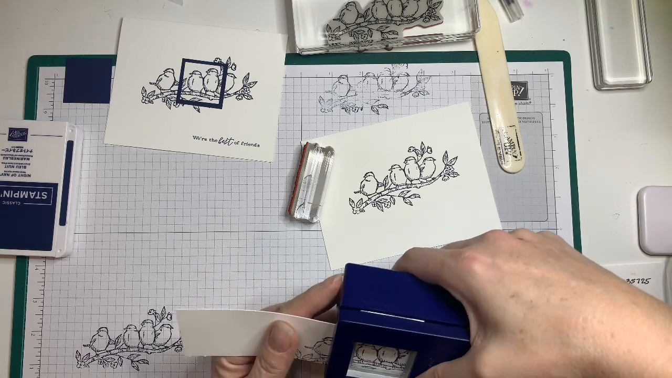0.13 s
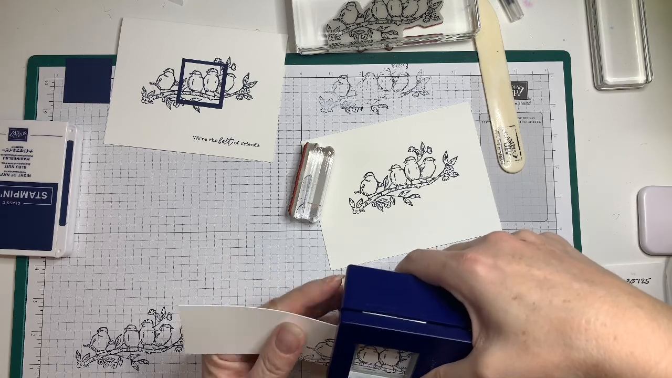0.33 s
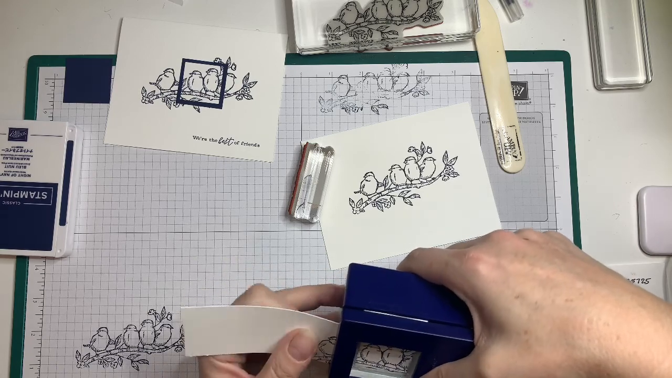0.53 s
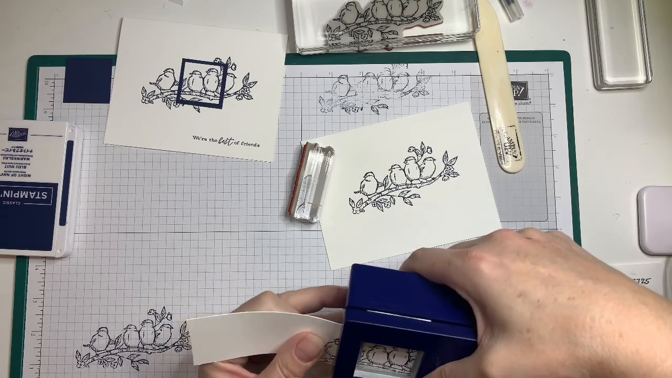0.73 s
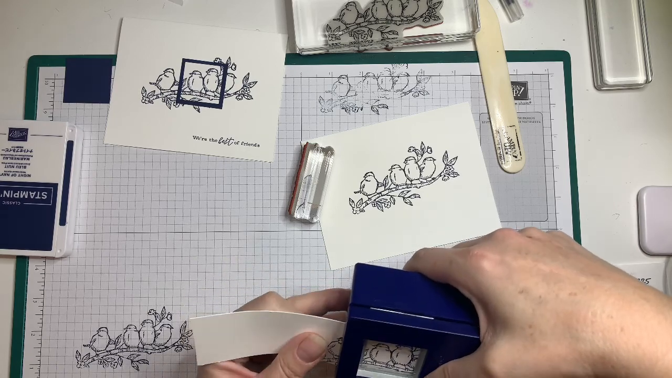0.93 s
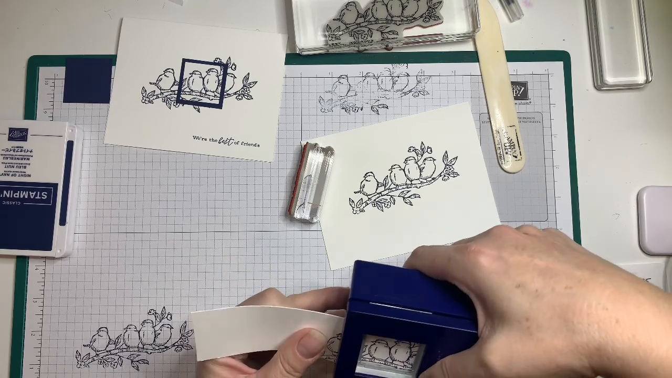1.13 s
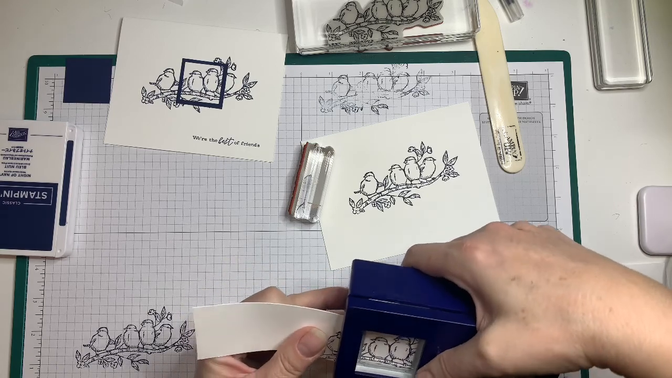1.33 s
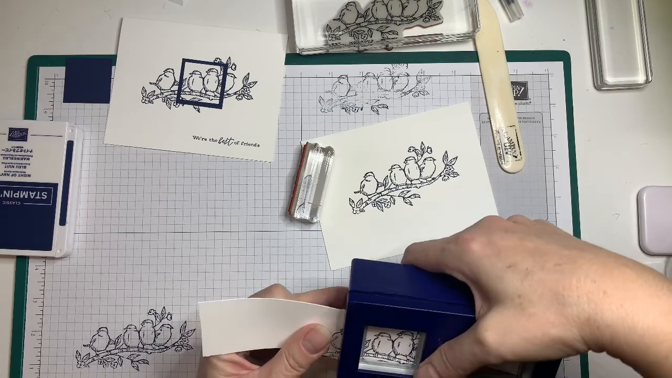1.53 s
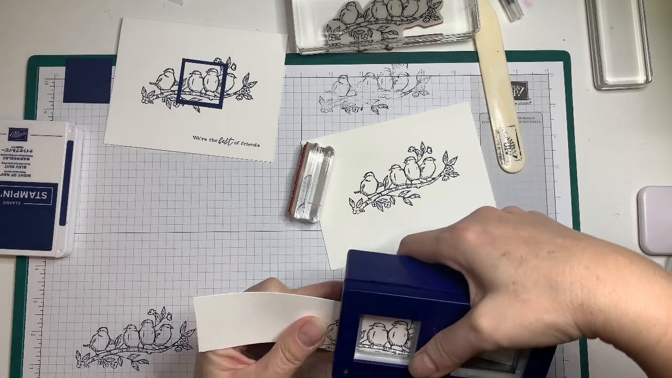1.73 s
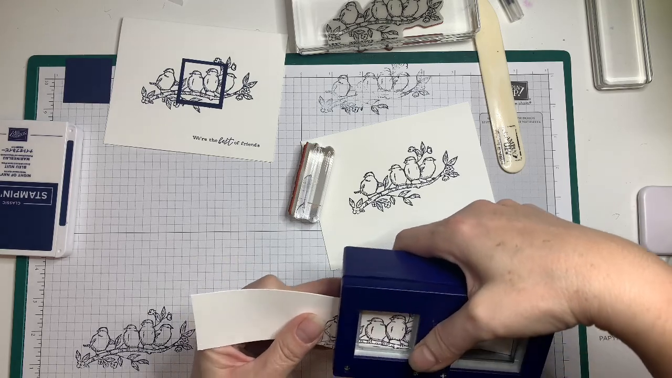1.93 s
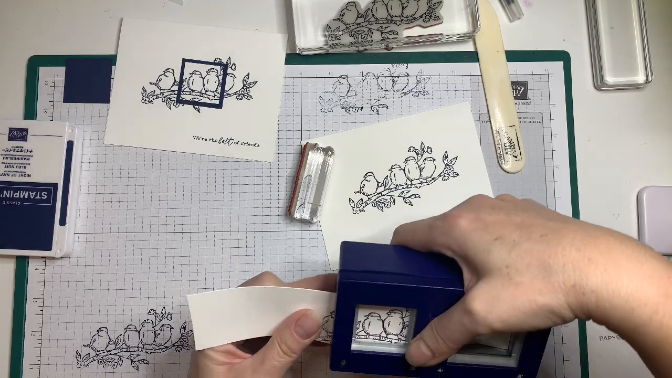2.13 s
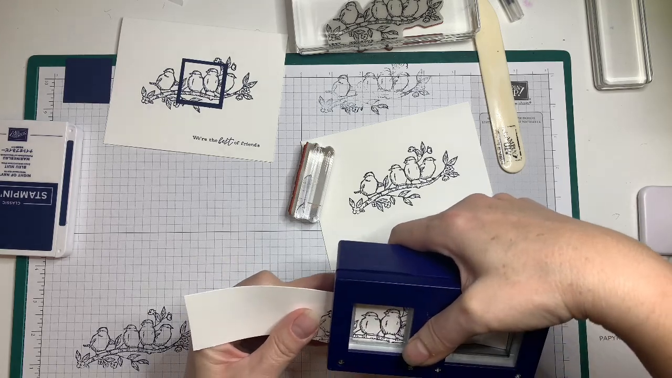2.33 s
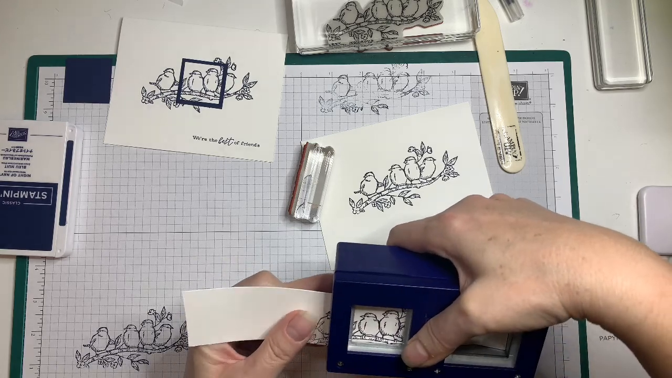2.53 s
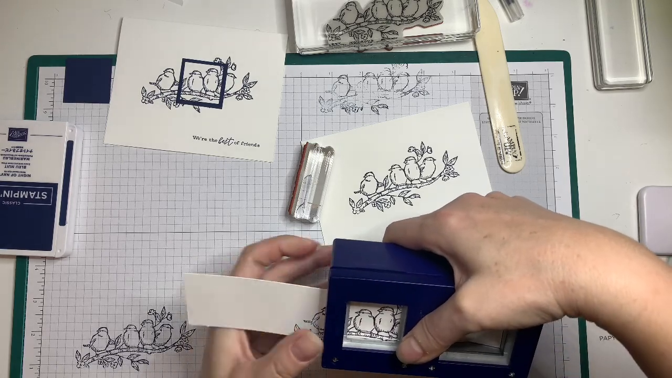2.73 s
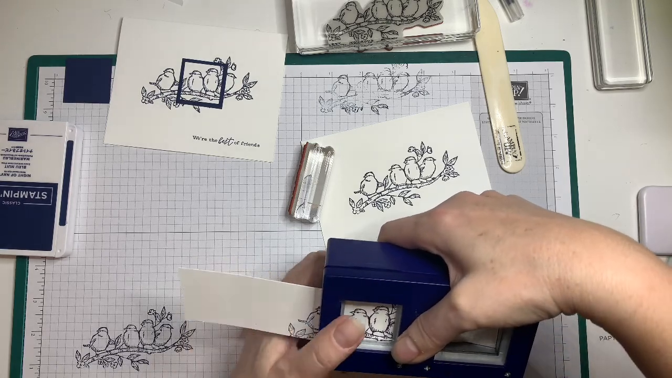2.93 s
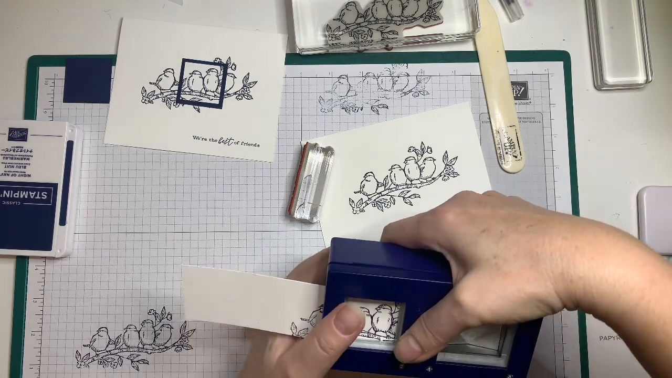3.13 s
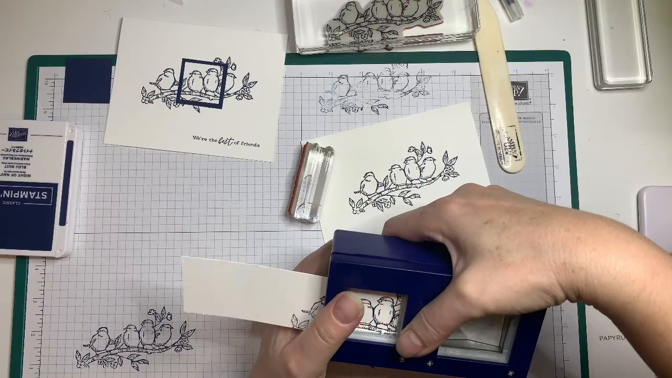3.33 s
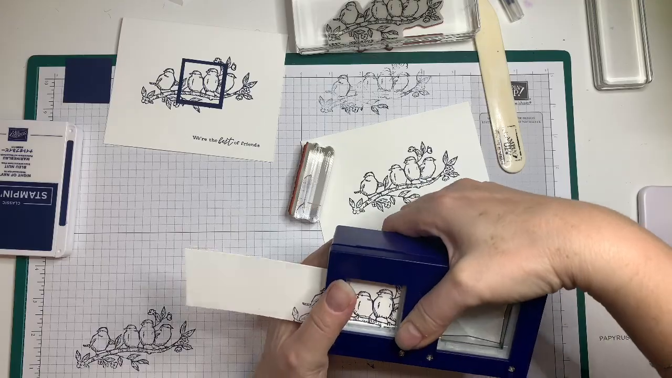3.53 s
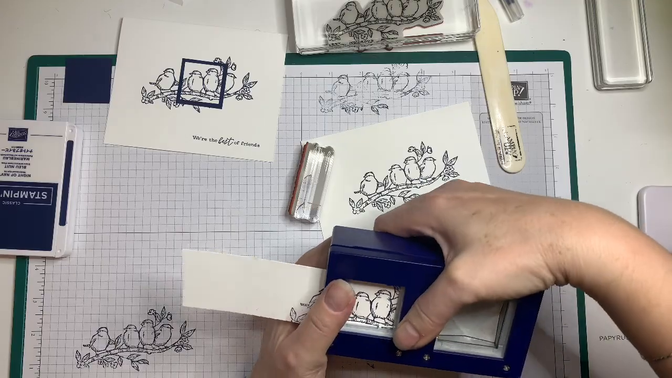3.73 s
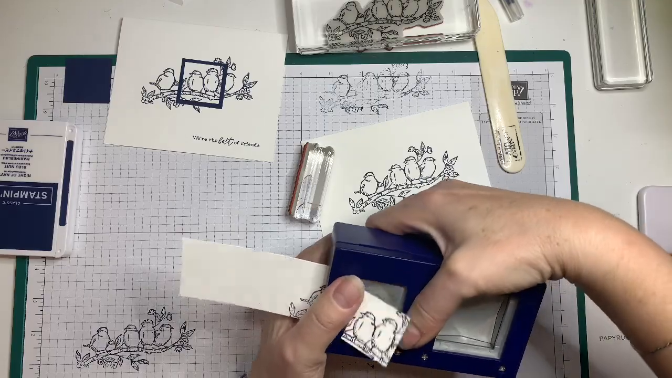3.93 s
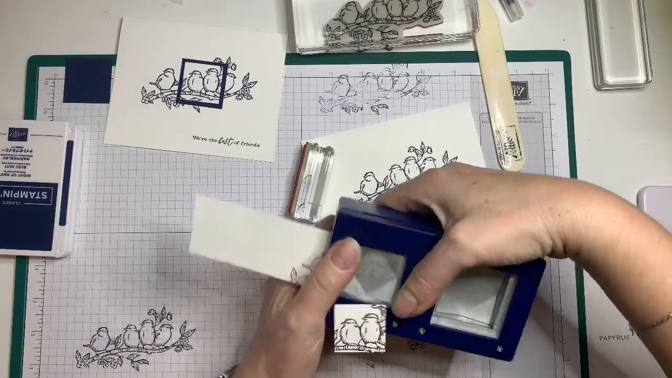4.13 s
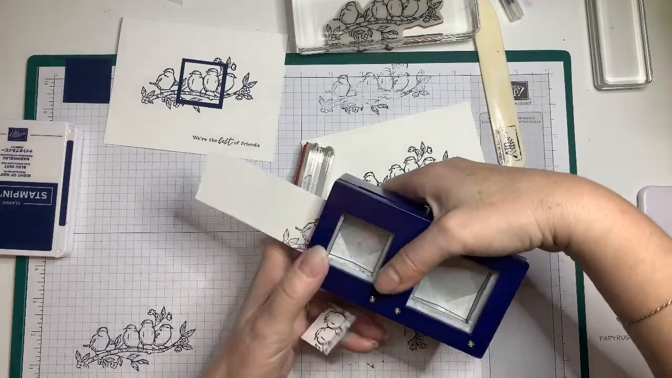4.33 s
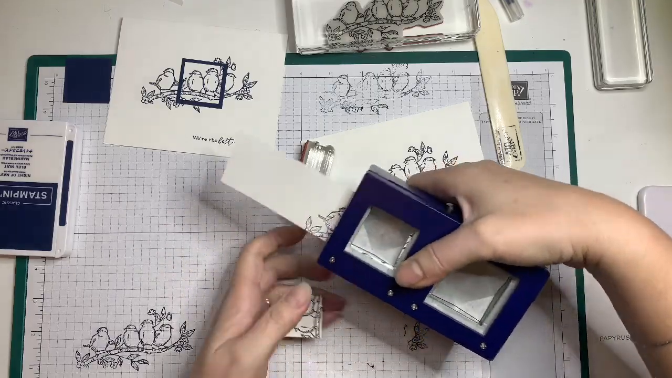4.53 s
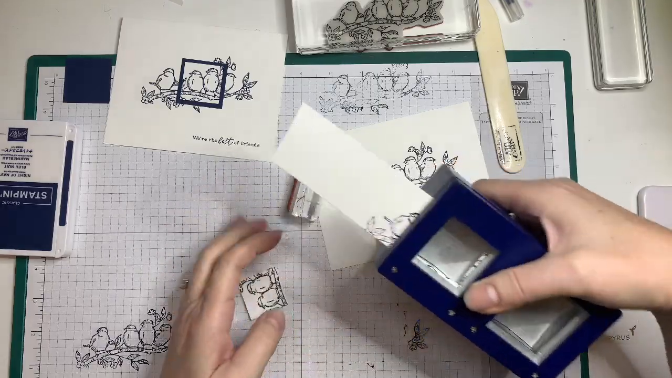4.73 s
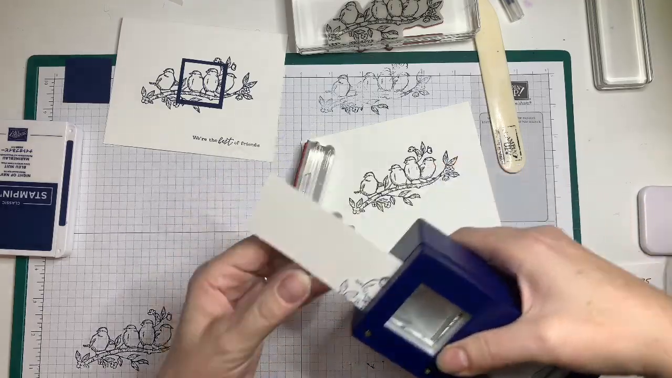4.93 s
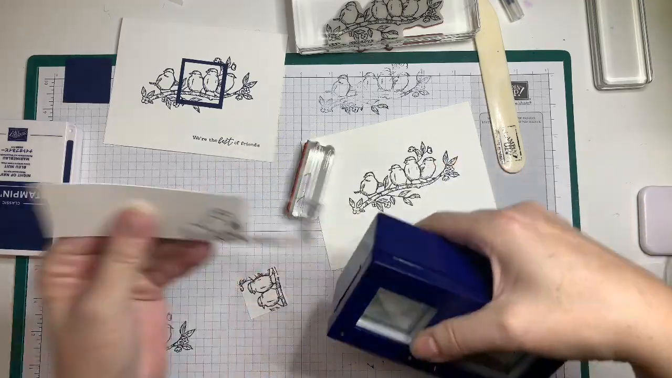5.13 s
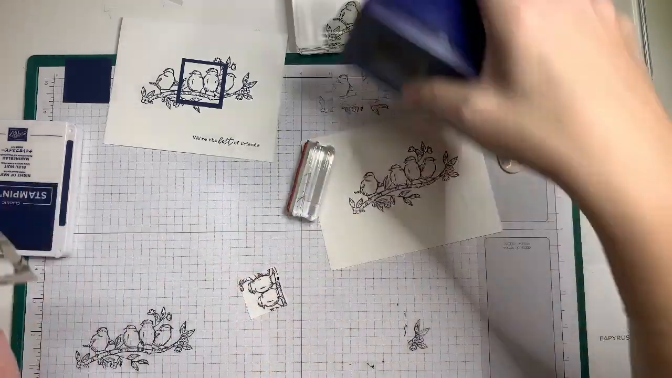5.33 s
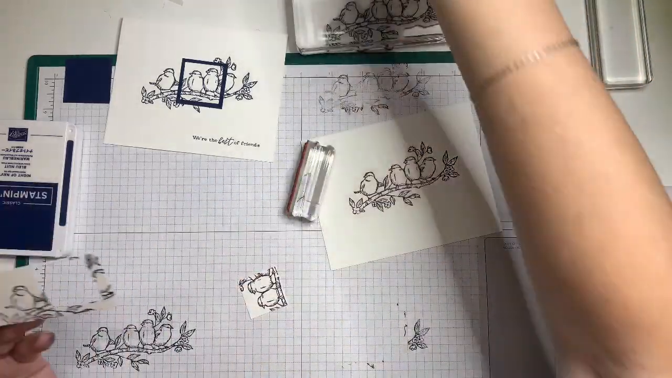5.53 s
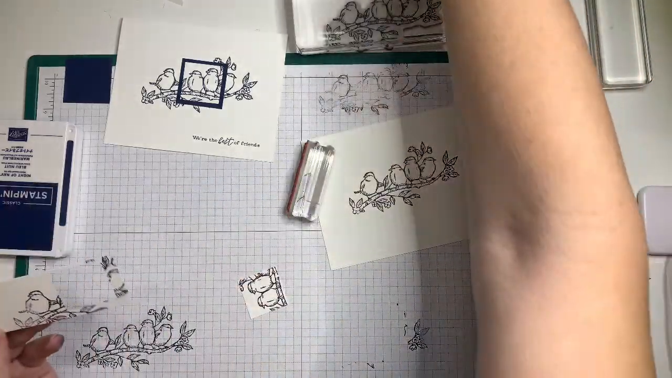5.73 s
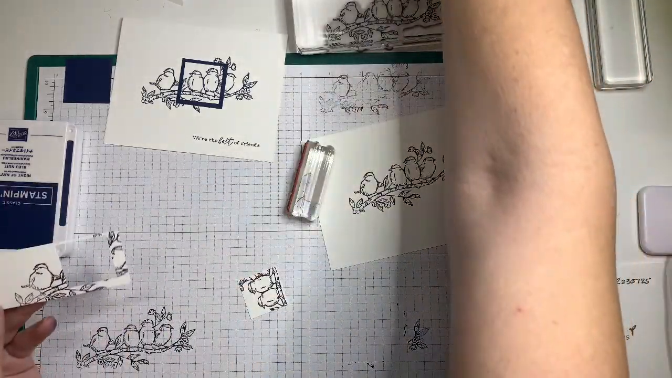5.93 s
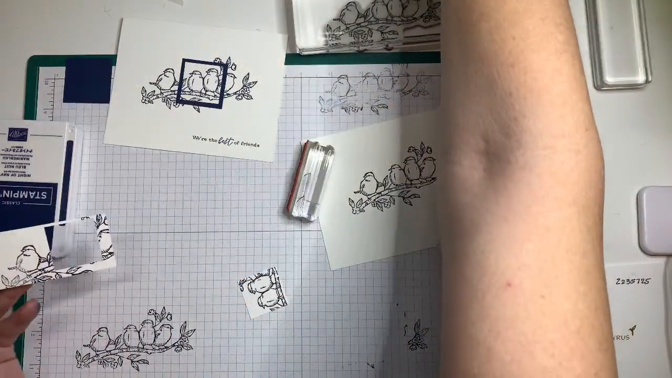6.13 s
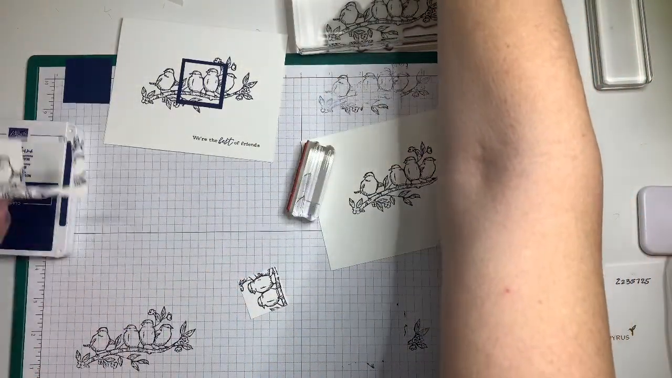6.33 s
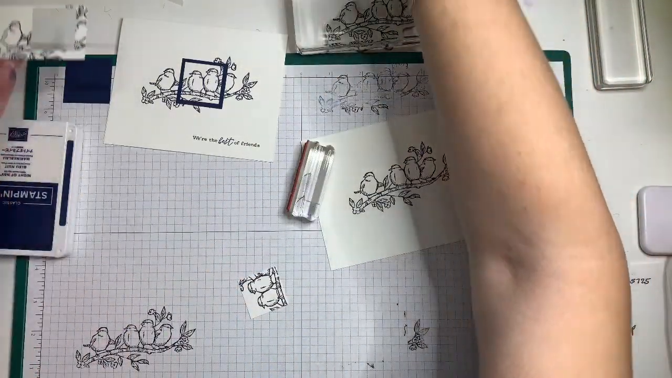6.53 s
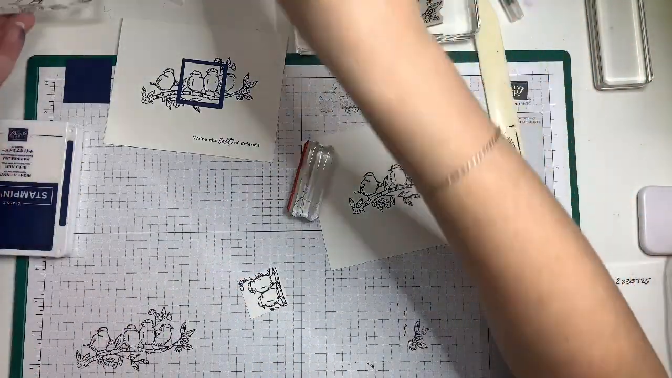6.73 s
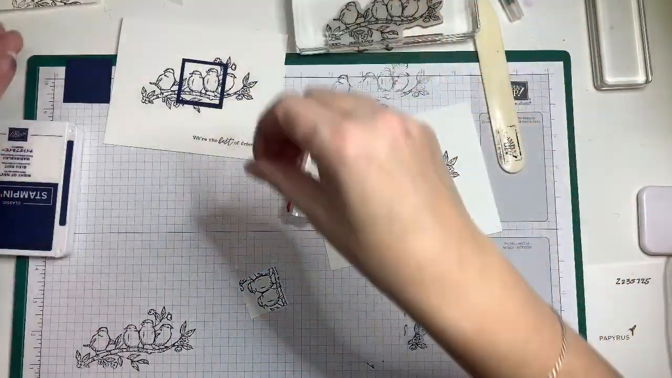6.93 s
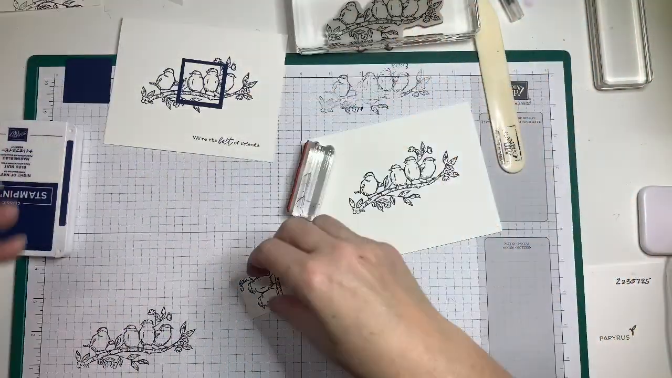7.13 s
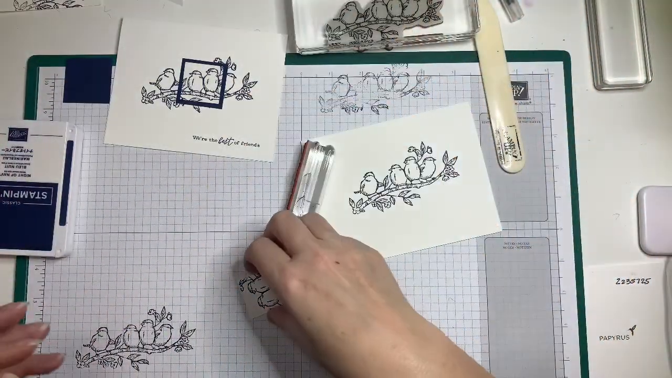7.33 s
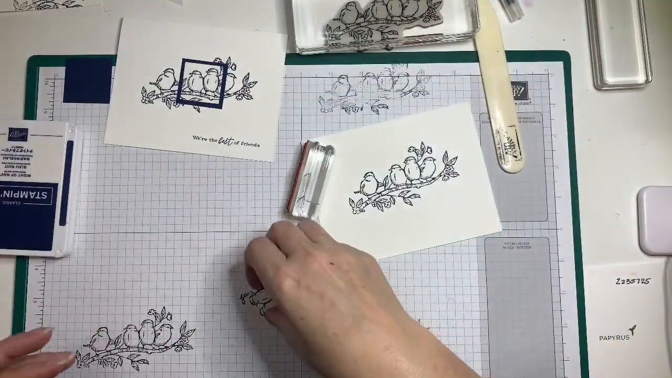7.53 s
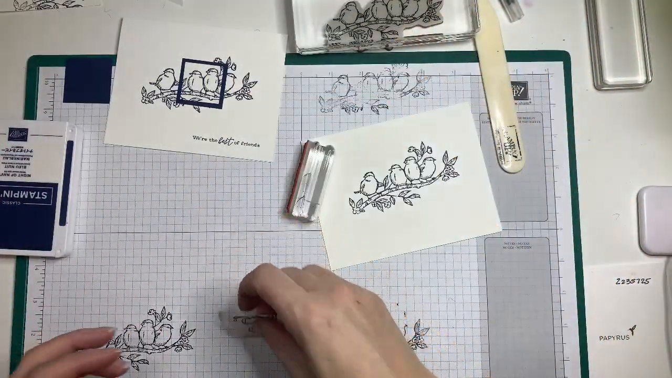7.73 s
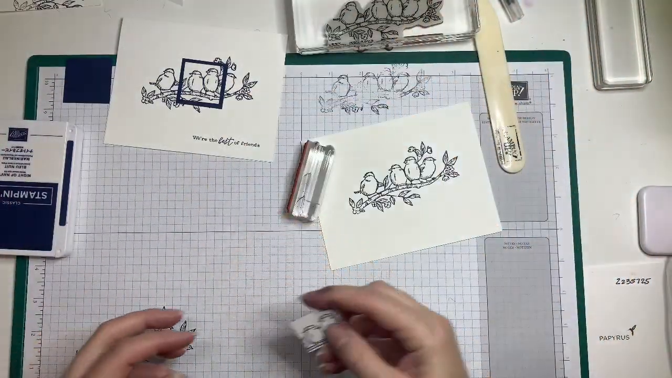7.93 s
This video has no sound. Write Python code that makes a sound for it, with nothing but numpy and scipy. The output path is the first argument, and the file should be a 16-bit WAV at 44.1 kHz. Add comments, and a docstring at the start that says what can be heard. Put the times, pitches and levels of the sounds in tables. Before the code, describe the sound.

A quiet small room, low rumble and a faint appliance hum, heard close to a desk. From 0 to 3 seconds card rubs faintly in a plastic punch, with sparse light ticks near 0.1, 0.4, 1.1 and 1.8, and barely audible squeaks around 2.5 to 3. A clearer click comes at 3.1. At 3.8 the lever grinds briefly and the die snaps through: a very loud, bright, dry crack, with a second hard slam at 3.87. From 4.1 to 4.2 the lever ratchets back in a short grind with several quick clicks; another tick at 4.4. Around 5.0 the paper strip rasps out with two small clicks, then soft brushing. At 6.1 the punch thuds firmly on the desk in a fast cluster, knocks again at 6.26, and clinks glassily at 6.32. From 7.3 soft fingertip bumps and light paper scuffs finish it.

```python
"""Faint rubs and light clicks come first: card is nudged into the slot of a plastic craft punch on a desk, close by.
The die snaps through, the lever hits its stop and grinds back up; the strip slides out, the punch thuds down and
clinks against something hard, and fingers pick up the cut piece. Blows are bursts of noise through resonances,
desk and glass are damped sines, rubs and grinding are random slips; a small room answers over rumble and hum.
A limiter drops the level at loud peaks, holds it down, then lets it recover."""
import sys
import numpy as np
from scipy import signal
from scipy.fft import rfft, irfft, next_fast_len
from scipy.io import wavfile
from scipy.ndimage import uniform_filter1d, minimum_filter1d, map_coordinates

SR = 44100
rng = np.random.default_rng(int(sys.argv[2]) if len(sys.argv) > 2 else 0)


def to_wav(sig):
    """Store sig (one row per channel, or 1-D mono) as 16-bit WAV at the path in sys.argv[1].

    Samples outside -1..1 are clipped; the rate is SR.
    """
    pcm = np.clip(np.atleast_2d(sig), -1, 1) * 32767
    pcm = np.round(pcm).astype(np.int16)
    wavfile.write(sys.argv[1], SR, pcm.T)  # frames by channels


N = 352800
TIME = np.arange(N) / SR
BRIEF = TIME[:SR // 3]  # time axis of single blows and of the echoes

# resonances of the plastic housing: pitch_hz [Hz], width_hz [Hz], level_db [dB]
HOUSING_MODES = [(866, 47, 0.5), (1036, 490, -7), (1690, 320, -6), (2000, 280, -4.5), (2336, 220, 0),
                 (3180, 630, -7.5), (3960, 230, 3), (4130, 130, -8.5), (4900, 170, -14.5)]
# the small shell radiates little bass: pitch_hz [Hz], level_db [dB]
HOLLOW_COLOUR = [(150, -20.5), (480, -15.5), (900, 9.5)]
# bright noise band for cracks and fizz, with a dip near 12.5 kHz: pitch_hz [Hz], level_db [dB]
TREBLE_COLOUR = [(3000, -29.5), (5000, 1.5), (7200, 1.5), (10000, -5.5), (12500, -23), (15500, -6.5)]
# spectrum of the low knock in a blow: pitch_hz [Hz], level_db [dB]
KNOCK_COLOUR = [(60, -15.5), (170, -4.5), (350, 3.5), (600, 1.5), (1100, -4.5), (3000, -38.5)]


def punch():
    """The card gives way in two tears that ring the die, then the lever slams on its stop."""
    # the punch stroke: start_s [s], level_db [dB], length_s [s]; knock_db, treble_db, die_db [dB over the level]
    snaps = [(3.8235, 2, 0.0056, -30.5, -14, -7), (3.8265, 7.5, 0.0032, -28.5, -17, 2),
             (3.8742, 4.5, 0.0093, -23.5, -4, -23.5)]
    # resonances of the steel die: pitch_hz [Hz], width_hz [Hz], level_db [dB]
    die_modes = [(2280, 480, -2.5), (4100, 180, -2.5)]
    out = np.zeros(N)
    for start_s, level_db, length_s, knock_db, treble_db, die_db in snaps:
        shell = plastic(length_s, knock_db, treble_db)
        die = amp(die_db) * contact(body(die_modes), length_s)
        add(out, start_s, amp(level_db) * (shell + die))
    held_aloft = colour([(160, -10), (350, 2)])  # off the desk, the punch moves little air in the bass
    return placed(filtered(out, held_aloft), near_db=-3, wet_db=-9.0)


def plastic(length_s, knock_db, treble_db):
    """One blow on the housing: its resonances, a low knock and a bright crack."""
    shell = contact(housing, length_s)
    knock = amp(knock_db) * contact(colour(KNOCK_COLOUR), length_s)
    crack = amp(treble_db) * contact(colour(TREBLE_COLOUR), length_s)
    return shell + knock + crack


def housing(hz):
    """Response of the punch's plastic shell: resonances with little bass."""
    return body(HOUSING_MODES)(hz) * colour(HOLLOW_COLOUR)(hz)


def lever():
    """Stick-slip of the moving die sounds through the housing, with a fizz of card fibres."""
    # the lever goes down, then back up: start_s [s], stop_s [s], full level_db [dB], build_db [dB]
    travels = [(3.806, 3.873, -15, 34.5), (4.138, 4.21, -34.5, 15.5)]
    build_s, stop_db_per_s = 0.028, 904.5  # friction builds under the hand and dies at the stop
    friction = np.zeros(N)
    for start_s, stop_s, level_db, build_db in travels:
        slack = np.clip(1 - (TIME - start_s) / build_s, 0, 1)
        stopping_db = stop_db_per_s * np.maximum(TIME - stop_s, 0)
        friction += (TIME > start_s) * amp(level_db - build_db * slack - stopping_db)
    slips = grains(rate=1100, spread_db=2)
    darker = colour([(2500, 0), (4000, -8)])
    ring = unit(filtered(slips, lambda hz: housing(hz) * darker(hz)))
    fizz = unit(filtered(grains(rate=6100, spread_db=5.5), colour(TREBLE_COLOUR)))
    return placed(friction * (ring + amp(-13.5) * fizz), near_db=-1.0, wet_db=-16.5)


def clicks():
    """Light contacts, each with a faint swell of noise leading in, favour other modes; dull ones lose upper modes."""
    # contacts of card, lever and housing: start_s [s], level_db [dB];
    # treble_db, knock_db [dB over the level]; favoured_hz [Hz]
    light_contacts = [(0.12, -44, -11, -11.5, 2450), (0.325, -53, -5.5, -31, 2420),
                      (0.379, -43, -11, -41, 2350), (0.508, -57, -15, -38, 2300),
                      (1.111, -52.5, -27, -23, 1570), (1.132, -40, -25, -40, 1560),
                      (1.213, -48, -41, -26.5, 1710), (1.826, -45.5, -13, -14, 1700),
                      (3.067, -57.5, -15.5, -22, 2320), (3.141, -30.5, -9.5, -14, 3120),
                      (3.323, -49, -9, -35, 3370), (3.627, -62.5, -9.5, -24, 3870),
                      (3.775, -43, -6, -25, 885), (4.124, -48.5, 1, -23, 1700),
                      (4.132, -41.5, -16, -17, 1720), (4.163, -33, -8, -25, 2160),
                      (4.182, -32.5, -19, -27, 2160), (4.201, -33.5, -22.5, -17, 1710),
                      (4.215, -26.5, -14.5, -26, 2480), (4.413, -38, -16, -30.5, 2240),
                      (4.838, -57.5, -24, -18, 1610), (4.903, -55.5, -5.5, -5, 926),
                      (4.982, -39, -6.5, -8.5, 4300), (4.991, -40, -5.5, -11, 900),
                      (6.108, -41.5, 2, -8, 1920), (6.746, -57.5, -10, 0, 4200),
                      (6.856, -58, -14, -11, 4160), (7.334, -64.5, -6, -3.5, 1370),
                      (7.41, -67, 1.5, -2, 1140), (7.484, -59, 5, 1, 850), (7.663, -58, 2, -20.5, 4510)]
    click_s = 0.0062
    bright_hz, db_per_octave = 5400, 19  # upper edge at treble 0 dB; treble lost for each octave it sinks
    favour_db, favour_octaves = 10.5, 0.35  # lift of the modes near the favoured frequency, and its spread
    out = np.zeros(N)
    for start_s, level_db, treble_db, knock_db, favoured_hz in light_contacts:
        edge_hz = bright_hz * 2 ** (treble_db / db_per_octave)
        modes = []
        for hz, width_hz, mode_db in HOUSING_MODES:
            octaves_off = np.log2(hz / favoured_hz)
            lift_db = favour_db * np.exp(-(octaves_off / favour_octaves) ** 2)
            modes.append((hz, width_hz, mode_db + lift_db))
        shell = lambda hz: body(modes)(hz) * colour(HOLLOW_COLOUR)(hz) / (1 + 1j * hz / edge_hz) ** 2
        crack = amp(treble_db) * contact(colour(TREBLE_COLOUR), click_s)
        knock = amp(knock_db) * contact(colour(KNOCK_COLOUR), click_s)
        add(out, start_s, amp(level_db) * (contact(shell, click_s) + crack + knock))
        lead_in = contact(shell, length_s=0.0093, rise_s=0.0045)
        add(out, start_s - 0.011, amp(level_db - 23) * lead_in)
    return placed(out, near_db=-1.5, wet_db=-4.5)


def desk():
    """Hard blows clack and ring the panel; padded ones only stir its low modes."""
    # dull blows on the desk: start_s [s], level_db [dB], clack_s [s]; clack_db, boom_db [dB over the level]
    thuds = [(5.408, -48.5, 0.027, -18, -20.5), (6.077, -17, 0.012, -13.5, 0),
             (6.107, -13.5, 0.0078, -10.5, -2.5), (6.117, -22.5, 0.041, -17, 2.5),
             (6.26, -27, 0.0071, -15, -5), (6.267, -28, .01, -24, 2)]
    # padded bumps of hand and fingertips: start_s [s], level_db [dB]
    bumps = [(3.376, -60.5), (4.385, -55), (7.337, -36.5), (7.359, -42.5), (7.414, -45), (7.49, -50)]
    # panel modes: pitch_hz [Hz], level_db [dB], t60_s [s]
    panel_modes = [(211.8, -0.5, 0.11), (264.6, -8, 0.17), (370.8, 6.5, 0.056), (406, 0, 0.058),
                   (508, -5.5, 0.061), (640, -3.5, 0.03)]
    # lower desk modes: pitch_hz [Hz], level_db [dB], t60_s [s]
    boom_modes = [(62.34, -15, 0.41), (102.4, -7, 0.27), (139, -1, 0.086), (178.4, -0.5, 0.054)]
    # spectrum of the hard clack: pitch_hz [Hz], level_db [dB]
    clack_colour = [(250, -8.5), (600, 2), (1200, 3), (1450, -6.5), (1850, -5), (2400, -8.5), (3200, -13),
                    (4500, -16.5), (9000, -23.5), (15000, -38)]
    out = np.zeros(N)
    for start_s, level_db, clack_s, clack_db, boom_db in thuds:
        panel = ringing(panel_modes, bloom=1.6)
        boom = amp(boom_db) * ringing(boom_modes, bloom=1.33)
        clack = amp(clack_db) * contact(colour(clack_colour), clack_s)
        add(out, start_s, amp(level_db) * (panel + boom + clack))
    padding = colour([(270, 3.0), (400, -12.0), (700, -17.5)])
    for start_s, level_db in bumps:
        soft = filtered(ringing(panel_modes + boom_modes, bloom=1.3), padding)
        add(out, start_s, amp(level_db) * soft)
    return placed(out, near_db=-4.5, wet_db=-3.0)


def clink():
    """A sharp crack, a brief buzz of the touching edges and a few fading glassy modes."""
    # the punch touches a hard, glassy object: start_s [s], ring_db [dB], crack_db [dB]
    clinks = [(6.3194, -36, -21.5)]
    # glassy modes: pitch_hz [Hz], level_db [dB], t60_s [s]
    glass_modes = [(2115, 5, 0.21), (2590, -6, 0.23), (2670, -29, 0.172), (4354, -2.5, 0.12),
                   (4590, -9, 0.1), (5430, -4, 0.12), (5281, -6, .2), (5870, 10.5, 0.065),
                   (6330, -6.5, 0.14)]
    # spectrum of crack and buzz: pitch_hz [Hz], level_db [dB]
    crack_colour = [(300, -8), (1000, -6.5), (1500, 6.5), (2200, 7.5), (3800, -2), (6200, 6), (7500, -14),
                    (9000, -35), (15000, -48.5)]
    out = np.zeros(N)
    for start_s, ring_db, crack_db in clinks:
        crack = contact(colour(crack_colour), length_s=0.00424)
        buzz = amp(-10.5) * contact(colour(crack_colour), length_s=0.021)
        ring = amp(ring_db) * ringing(glass_modes, bloom=1)
        add(out, start_s, ring + amp(crack_db) * (crack + buzz))
    return placed(out, near_db=-3.5, wet_db=-13)


def sliding():
    """Paper fibres catch and slip in each stroke: grainy rub, finer hiss, faint rough squeak; hands brush the mat."""
    # strokes of card and hands over the desk: start_s [s], length_s [s], rub_db [dB], hiss_db [dB over the rub]
    strokes = [(-.04, 0.164, -59, -9), (0.2, 0.37, -67, -1), (0.518, 0.24, -69, -3), (1.1, 0.33, -66, -15),
               (1.725, 0.177, -70, -3.5), (1.997, 0.067, -70.5, -3.5), (2.39, 0.26, -71, -4),
               (2.85, 0.4, -81.5, 2), (3.303, 0.082, -61.5, -9.5), (3.673, .11, -69, -6),
               (4.41, 0.44, -70, 2.5), (4.699, 0.34, -76.5, -2.5), (4.975, .165, -49.5, 3.5),
               (5.075, 0.63, -67, -2), (5.5, 0.56, -72, -3.5), (6.72, 0.14, -66.5, -10.5),
               (7.309, 0.144, -81, 1), (7.594, 0.13, -68.5, 6.5), (7.752, 0.154, -63.5, -2),
               (7.954, 0.14, -68.5, -3)]
    # card squeaks in the slot: start_s [s], length_s [s], level_db [dB]
    squeaks = [(2.491, 0.13, -65), (2.617, 0.16, -72), (2.852, 0.17, -71.5)]
    # spectrum of the rub: pitch_hz [Hz], level_db [dB]
    rub_colour = [(300, -25.5), (550, -14.5), (880, -3), (1400, -6), (2050, 4), (2600, -3.5), (3200, -2.5),
                  (4500, -5.5), (7000, -23.5), (11000, -45.5)]
    # spectrum of the fine fibre hiss: pitch_hz [Hz], level_db [dB]
    hiss_colour = [(2500, -24), (4300, 4.5), (6000, 2), (9000, -3.5), (11000, -10.5), (12500, -21.5),
                   (15000, -11)]
    rubbing, hissing = amp(-83.5), amp(-88)  # the held card is never quite still
    for start_s, length_s, rub_db, hiss_db in strokes:
        level = amp(rub_db) * stroke(start_s, length_s)
        rubbing = np.maximum(rubbing, level)
        hissing = np.maximum(hissing, amp(hiss_db) * level)
    squeaking = sum(amp(level_db) * stroke(start_s, length_s) for start_s, length_s, level_db in squeaks)

    pressure_db = 1.5 * wobble(45)
    shift_db = 3.3  # how far the bands of rub and squeak swell
    catches = filtered(grains(rate=3000, spread_db=3.5), colour(rub_colour))
    rub = rubbing * amp(pressure_db) * patchy(catches, shift_db)
    fibres = filtered(grains(rate=9000, spread_db=4), colour(hiss_colour))
    hiss = hissing * amp(0.49 * pressure_db) * patchy(fibres, depth_db=1.5)
    squeak_body = body([(3400, 1200, 0)])
    chatter = filtered(grains(rate=900, spread_db=3), lambda hz: squeak_body(hz) ** 2)
    squeak = squeaking * amp(pressure_db) * patchy(chatter, shift_db)
    brush = amp(pressure_db) * brushing()
    return placed(rub + hiss + squeak + brush, near_db=-2.0, wet_db=-8.5)


def brushing():
    """Skin drags over the desk mat in dense, soft slips through one dull resonance."""
    # strokes of the hand on the mat: start_s [s], length_s [s], level_db [dB]
    brushes = [(-.02, 0.2, -62), (4.47, 0.45, -73), (4.975, 0.25, -64), (5.143, 0.57, -68),
               (5.547, 0.59, -72.5), (6.059, .03, -48.5), (7.303, 0.15, -67)]
    mat_hz, mat_width_hz = 710, 400
    speed = sum(amp(level_db) * stroke(start_s, length_s) for start_s, length_s, level_db in brushes)
    slips = filtered(grains(rate=2800, spread_db=3.5), body([(mat_hz, mat_width_hz, 0)]))
    return speed * unit(filtered(slips, colour([(2500, -3), (7000, -11)])))


def background():
    """Rumbling noise alike at both ports, noise of opposite sign in each, and a slightly unsteady appliance hum."""
    # spectrum of the room noise: pitch_hz [Hz], level_db [dB]
    air_colour = [(15, -43), (25, -14.5), (64, -6), (153, -22.5), (242, -19.5), (277, -27), (373, -28),
                  (695, -39.5), (911, -34), (1370, -37.5), (1610, -36), (1790, -40.5), (3430, -45),
                  (4250, -37), (16000, -58.5)]
    # appliance hum: pitch_hz [Hz], level_db [dB]
    hum_tones = [(60, -68), (120, -76), (240, -72)]
    mid, side = filtered(rng.standard_normal((2, N)), colour(air_colour))
    side = filtered(unit(side), colour([(60, -14.5), (200, -2), (500, 1.5)]))
    hum = 0
    for hz, level_db in hum_tones:
        level = amp(level_db + 0.88 * wobble(1.2))
        phase = 2 * np.pi * hz * TIME + 0.42 * wobble(9)
        hum = hum + level * np.sqrt(2) * np.sin(phase)
    return amp(-65.5) * (unit(mid) + np.array([side, -side])) + hum


def placed(x, near_db, wet_db):
    """Direct sound leads at the left port; near objects and room echo differently at each, less so in the bass."""
    # the left port's lead over the right: pitch_hz [Hz], lead [radians]
    port_lead = [(0, 2), (1810, 0.5), (2930, 1.87), (4480, 0.76), (6550, 5.0), (9130, 6.5), (11600, 9),
                 (13400, 9.9), (16400, 15.5)]
    # reverberation of the small room: pitch_hz [Hz], t60_s [s]
    room_decay = [(70, 0.35), (135, 0.54), (220, 0.34), (400, 0.17), (900, 0.28), (1500, 0.23),
                  (4500, 0.28), (9000, 0.28), (15000, 0.26)]
    # how much the echoes differ between the close ports: pitch_hz [Hz], level_db [dB]
    apart_colour = [(60, -12.5), (130, -3.5), (300, -3)]
    bass_hz = 1000  # below this, the long waves reach both ports more and more alike
    side = np.array([[0.5], [-0.5]])

    def lead(hz):
        angle = np.interp(hz, *np.transpose(port_lead)) * np.minimum(hz / bass_hz, 1)
        return np.exp(1j * side * angle)

    direct = filtered(x, lead)
    # the room is noise whose bands fade at their own pace
    hz, t, z = signal.stft(rng.standard_normal((2, SR // 2)), SR, nperseg=256)
    fade_db = -60 * t / along(room_decay, hz)[:, None]
    tail = signal.istft(z * amp(fade_db), SR)[1][:, :len(BRIEF)]
    near = rng.standard_normal(tail.shape) * BRIEF * np.exp(-BRIEF / 0.0025)
    room = amp(wet_db) * tail / np.linalg.norm(tail[0])
    nearby = amp(near_db) * near / np.linalg.norm(near[0])
    common, apart = room + nearby
    echoes = (common + 2 * side * filtered(apart, colour(apart_colour))) / np.sqrt(2)
    return direct + signal.oaconvolve(x[None], echoes, axes=1)[:, :N]


def contact(response, length_s, rise_s=0.00039):
    """A short crush of tiny slips through a body; rms about 1 while it lasts."""
    force = (1 - np.exp(-BRIEF / rise_s)) * np.exp(-(BRIEF / length_s) ** 2)
    x = filtered(force * rng.standard_normal(len(BRIEF)), response)
    return x * np.sqrt(length_s * SR / np.sum(x ** 2))


def ringing(modes, bloom):
    """Damped modes that take about bloom cycles to build up, so the low ones swell last."""
    out = 0
    for hz, level_db, t60_s in modes:
        decay = amp(level_db - 60 * BRIEF / t60_s)
        swell = 1 - np.exp(-(BRIEF * hz / bloom) ** 2)
        out = out + decay * swell * np.sin(2 * np.pi * (hz * BRIEF + rng.random()))
    return out


def body(modes):
    """Causal response of a set of resonances (Hz, width Hz, dB)."""
    return lambda f: sum(amp(db) * 1j * f * w / (c * c - f * f + 1j * f * w) for c, w, db in modes)


def grains(rate, spread_db):
    """Random slips of uneven size, rate a second, scaled to rms 1."""
    struck = rng.random(N) < rate / SR
    size = rng.standard_normal(N) * amp(spread_db * rng.standard_normal(N))
    return unit(struck * size)


def patchy(x, depth_db):
    """The rubbing spot keeps moving, so different narrow bands swell for moments; rms 1."""
    z = signal.stft(x, nperseg=512)[2]
    field = uniform_filter1d(rng.standard_normal(z.shape), size=5, axis=0)  # smooth over pitch
    field = uniform_filter1d(field, size=8, axis=1)  # smooth over time
    return unit(signal.istft(z * amp(depth_db * unit(field)))[1][:N])


def stroke(start_s, length_s):
    """Speed of one hand movement: attack, hold, release."""
    attack_share, release_share = 0.41, 0.4  # parts spent speeding up and slowing down
    u = (TIME - start_s) / length_s
    return np.clip(np.minimum(u / attack_share, (1 - u) / release_share), 0, 1)


def wobble(rate):
    """A smooth random curve, rate knots a second."""
    return map_coordinates(rng.standard_normal(int(N * rate / SR) + 4), [TIME * rate])


def colour(points):
    """Causal minimum-phase response with the given spectrum (Hz, dB)."""
    def response(hz):
        cepstrum = irfft(np.log(amp(along(points, hz))))
        half = len(cepstrum) // 2
        return np.exp(rfft(np.r_[cepstrum[0], 2 * cepstrum[1:half]], 2 * half))
    return response


def filtered(x, response):
    """x times a complex response of frequency."""
    n = x.shape[-1]
    m = 2 * next_fast_len(n // 2 + SR // 8)  # padded so that tails do not wrap round
    return irfft(rfft(x, m) * response(np.fft.rfftfreq(m, 1 / SR)), m)[..., :n]


def along(points, hz):
    """(Hz, value) points read on a log axis."""
    f, v = np.transpose(points)
    return np.interp(np.log(hz + 1), np.log(f + 1), v)


def amp(db):
    """Decibels to gain."""
    return 10 ** (np.asarray(db) / 20)


def unit(x):
    """Scale to rms 1."""
    return x / np.sqrt(np.mean(x ** 2) + 1e-20)


def add(track, start_s, x):
    """Mix x into the track at start_s."""
    part = track[..., round(start_s * SR):][..., :x.shape[-1]]
    part += x[..., :part.shape[-1]]


def scene():
    """Everything on the desk, in the room."""
    return punch() + lever() + clicks() + desk() + clink() + sliding() + background()


def limiter(x, ceiling_db, hold_s, release_db_per_s):
    """Gain drops just ahead of a peak, holds, then recovers at a steady rate in dB."""
    peak_db = 20 * np.log10(np.abs(x).max(0) + 1e-9)
    over = np.maximum(peak_db - ceiling_db, 0)
    size = 2 * int(hold_s * SR / 2) + 1
    held = -minimum_filter1d(-over, size, origin=size // 2)
    release = release_db_per_s * TIME
    cut = np.maximum.accumulate(held + release) - release
    ahead = -minimum_filter1d(-cut, size=129)
    return x * amp(-uniform_filter1d(ahead, size=129))


def record(dry):
    """Loud peaks are limited, then everything above the band limit is removed."""
    top_hz = 16000
    limited = limiter(dry, ceiling_db=-0.3, hold_s=0.12, release_db_per_s=149.5)
    return filtered(limited, lambda hz: hz < top_hz)


dry = scene()
out = record(dry)
to_wav(out)
```